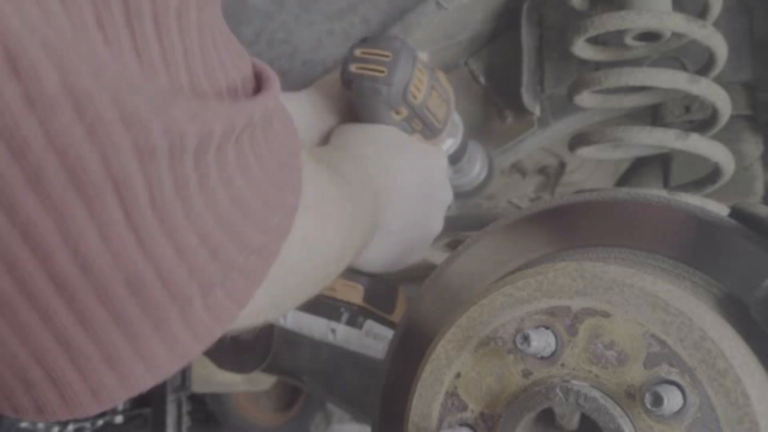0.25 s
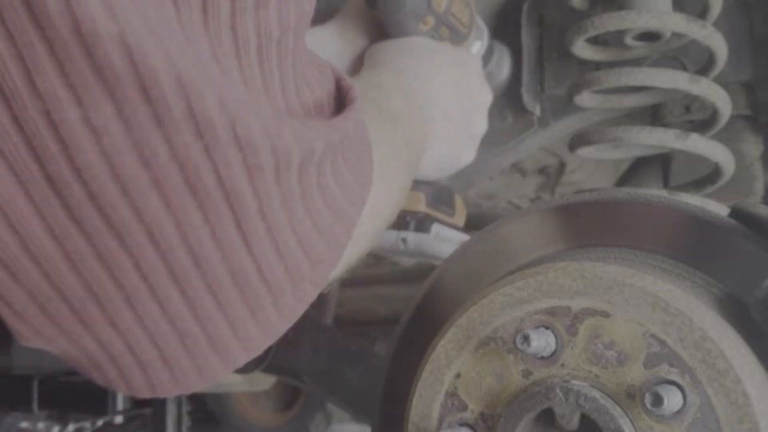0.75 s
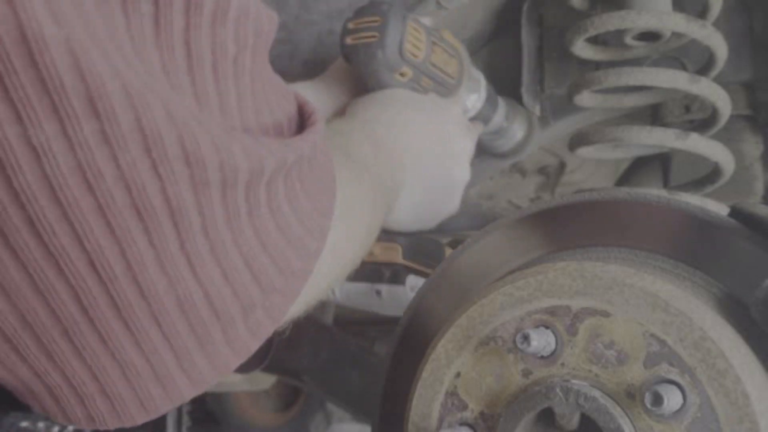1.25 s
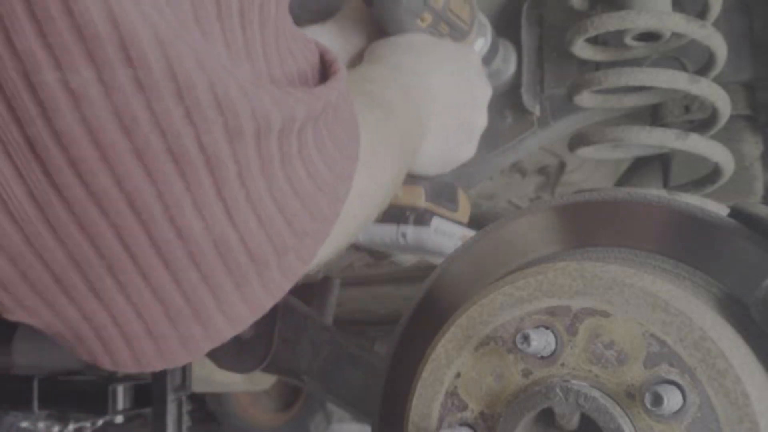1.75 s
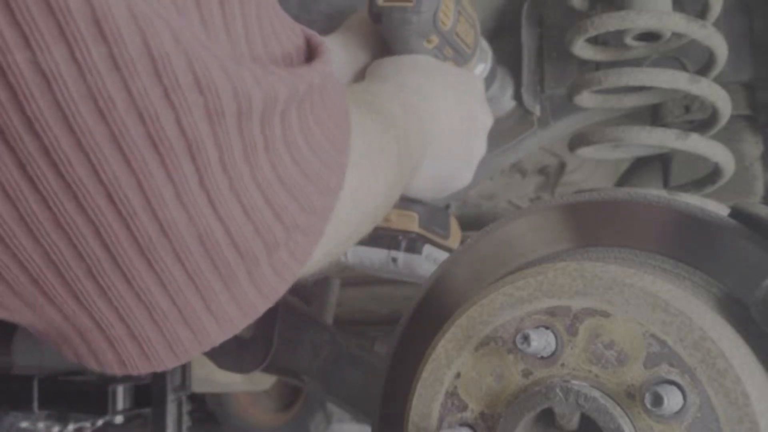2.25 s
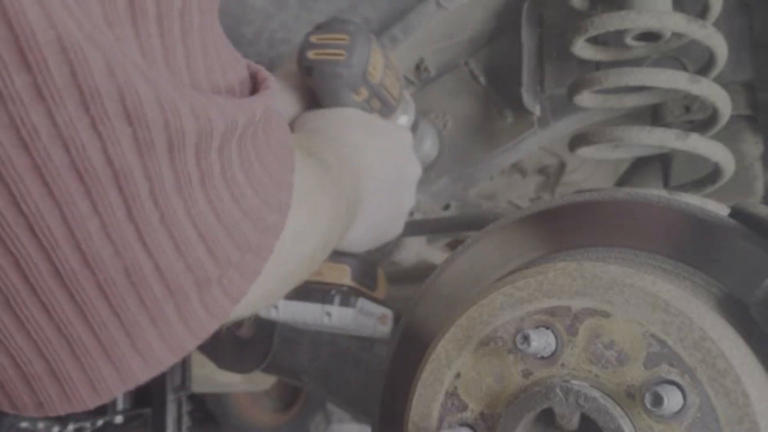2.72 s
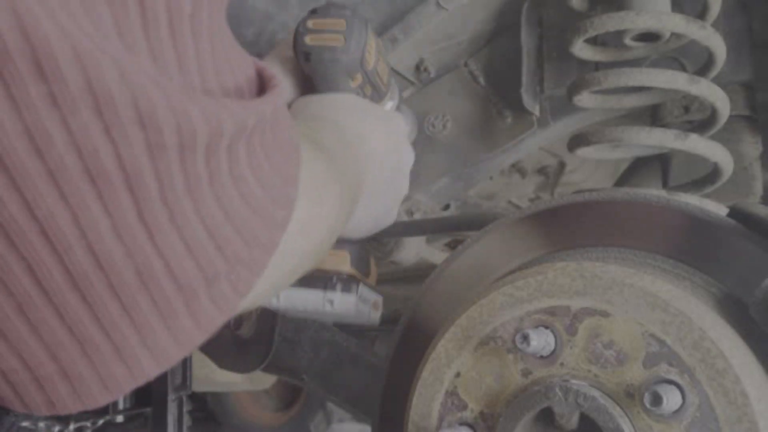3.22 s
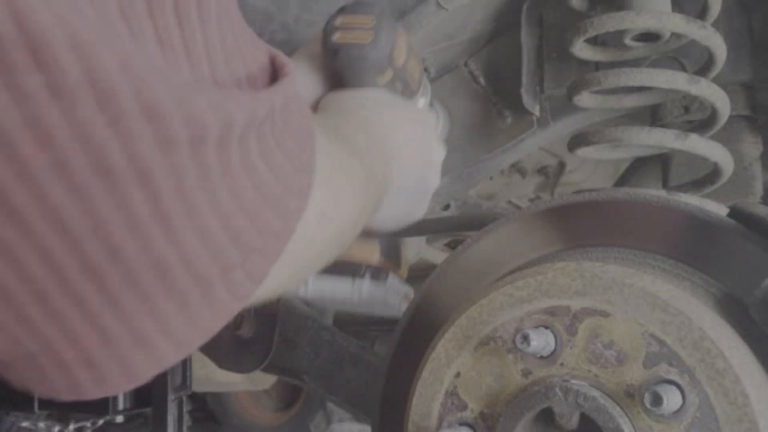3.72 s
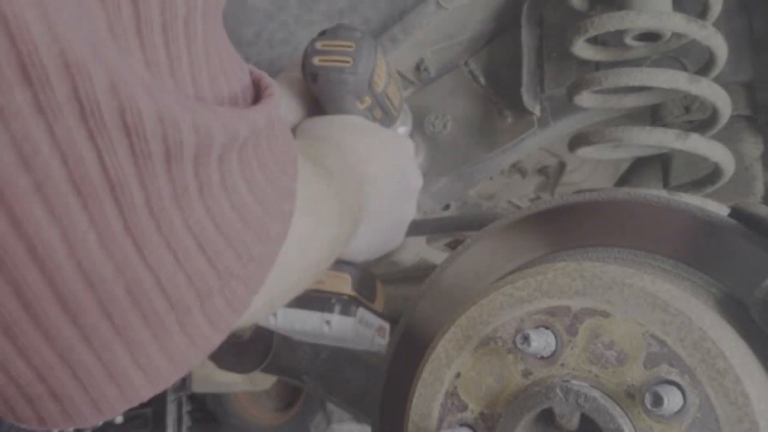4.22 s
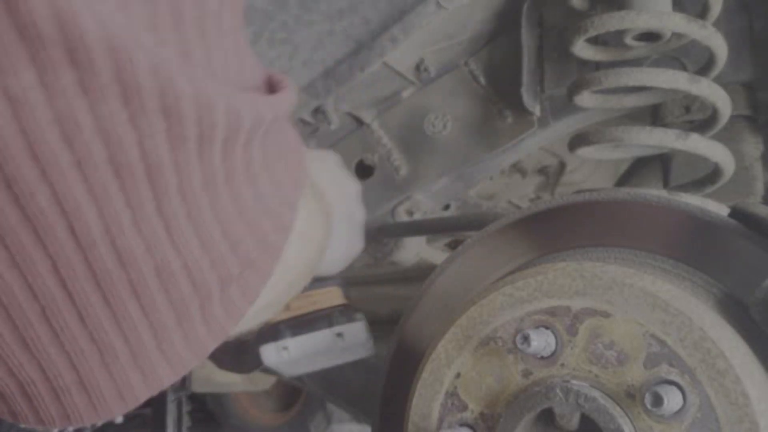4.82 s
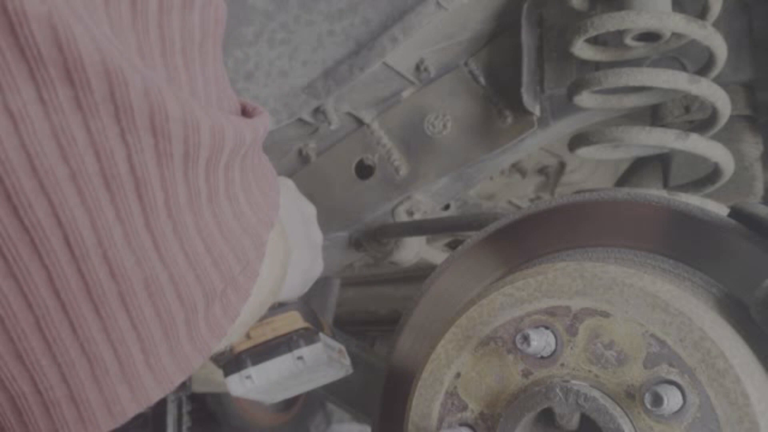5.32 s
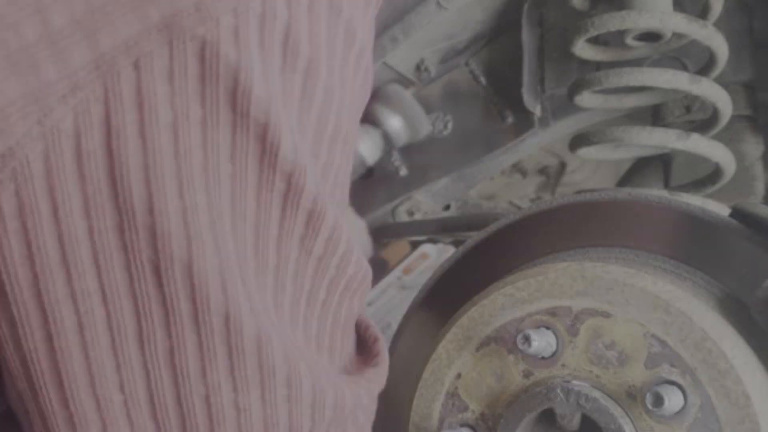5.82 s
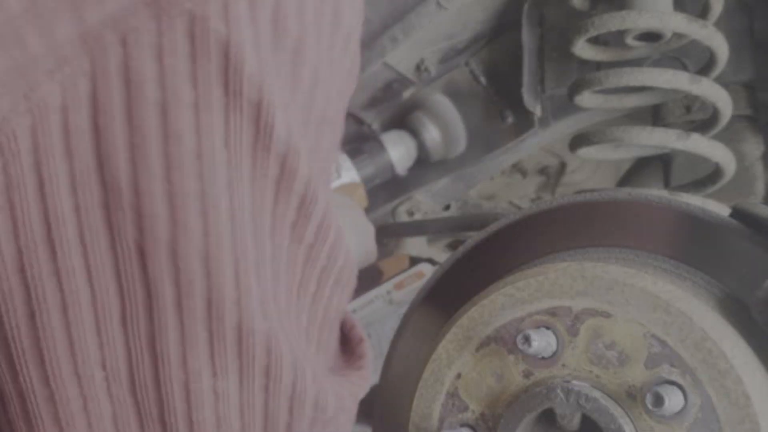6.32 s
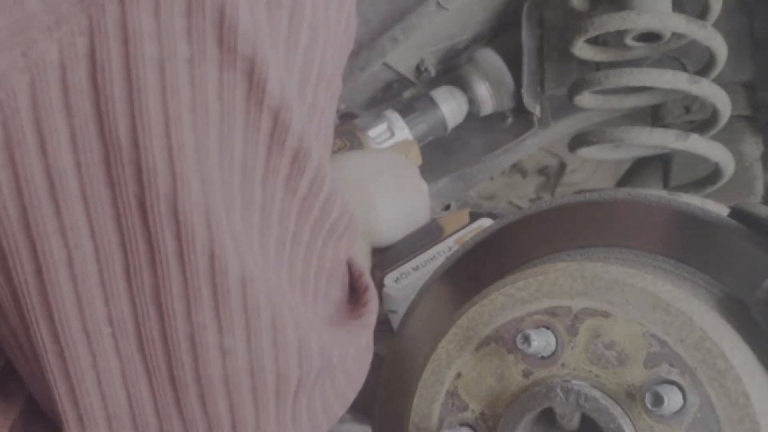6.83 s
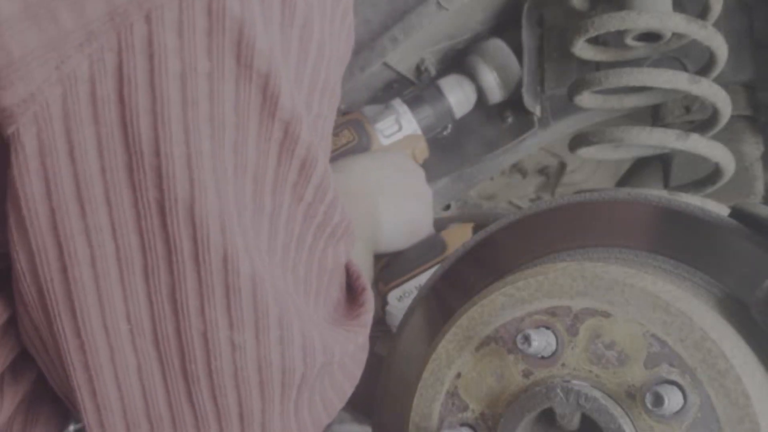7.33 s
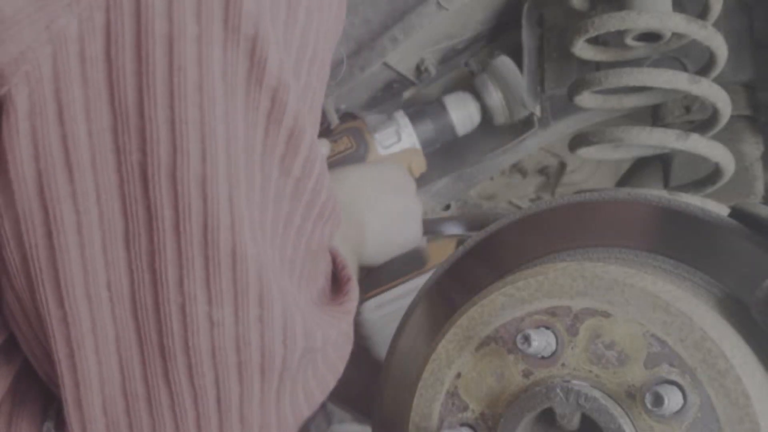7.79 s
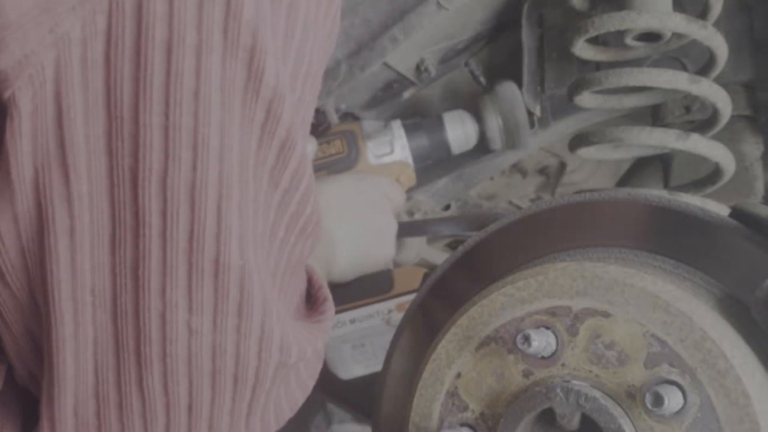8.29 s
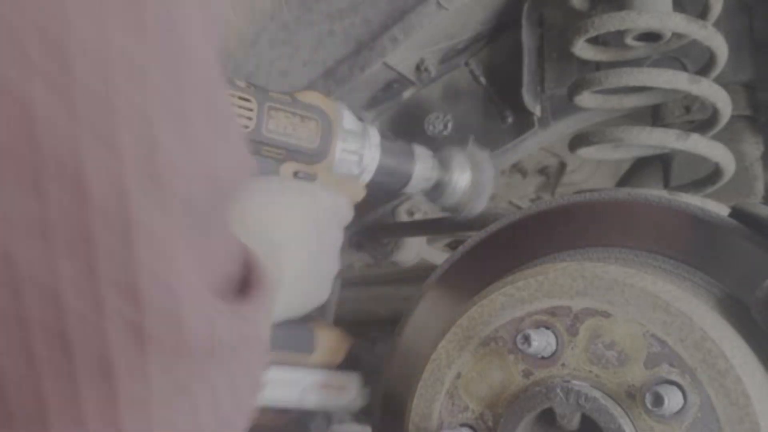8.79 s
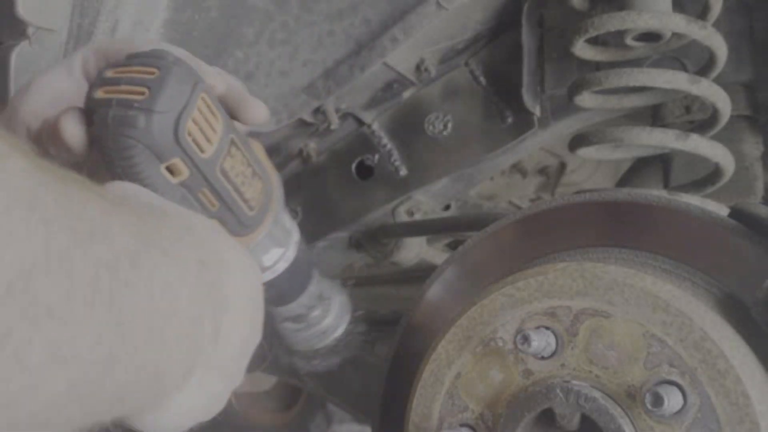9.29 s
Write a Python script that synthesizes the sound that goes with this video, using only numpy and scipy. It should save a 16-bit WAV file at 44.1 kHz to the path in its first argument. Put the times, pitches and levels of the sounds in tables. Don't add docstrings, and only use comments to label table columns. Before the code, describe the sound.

An arm's-length microphone catches continuous wire-brush scouring: a wavering electric whine beneath dense, gritty hiss and sliding metallic rings. Hard hollow knocks break through early, near the middle and later, with a deep hum shaking in at the opening and again around halfway. After fainter hub chatter the wheel stops abruptly with a tiny downward squeal. Quiet garage air is left, with plastic clicks, tiny squeaks and cloth rustle.

```python
import sys
import numpy as np
from scipy import signal
from scipy.io import wavfile
from scipy.ndimage import uniform_filter1d

SR = 44100
rng = np.random.default_rng(int(sys.argv[2]) if len(sys.argv) > 2 else 0)


def linear_from_db(decibels):
    return 10 ** (np.asarray(decibels, float) / 20)


def unload_audio(sound):
    columns = np.transpose(np.atleast_2d(sound))
    steps = np.round(np.clip(columns, -1, 1) * 32767)
    wavfile.write(sys.argv[1], SR, steps.astype(np.int16))


N = 421139
T = np.arange(N) / SR
EARS = np.array([[0.5], [-0.5]])
STOP_S, CUT_S = 8.482, 0.016

# t/s, f/Hz
SPEED = [(0.23, 329.6), (0.5, 347.5), (0.7, 347), (0.82, 326.5), (1.25, 319.8), (1.4, 327), (1.54, 329),
         (1.59, 319), (1.64, 324), (1.7, 318), (1.76, 323), (1.82, 318), (2.0, 319.5), (2.19, 320.5),
         (2.27, 318.5), (2.35, 330), (2.65, 354), (2.87, 344.5), (2.95, 353), (3.05, 342), (3.2, 349),
         (3.55, 349.5), (3.7, 343.5), (3.9, 345), (4.0, 336), (4.12, 328.5), (4.34, 338), (4.45, 346),
         (4.74, 340), (4.83, 343), (4.87, 336), (5.0, 343), (5.1, 345), (5.2, 337.5), (5.3, 341),
         (5.4, 344), (5.53, 341), (5.75, 343), (5.86, 326.6), (6.17, 325), (6.25, 318), (6.31, 327),
         (6.4, 326.7), (6.62, 338), (6.78, 351), (6.92, 338), (7.11, 351.5), (7.4, 343), (7.86, 346),
         (8.03, 338), (8.33, 351), (8.42, 344)]
# t/s, pressure/dB
PRESS = [(0.0, -20), (0.61, -21.5), (0.7, -19), (1.41, -19), (1.51, -22.5), (1.55, -19), (2.24, -19),
         (2.59, -23), (2.85, -21.5), (3.37, -22.5), (4.12, -20), (4.15, -21), (5.18, -24.5), (6.24, -23.5),
         (6.31, -25.5), (7.63, -26), (7.92, -24), (8.46, -27)]


def evened(x):
    return x / np.sqrt(np.mean(x ** 2) + 1e-20)


def read(points, hz):
    f, value = np.transpose(points)
    return np.interp(np.log(hz + 1), np.log(f + 1), value)


def add(mix, s, sound):
    part = mix[..., round(s * SR):][..., :sound.shape[-1]]
    part += sound[..., :part.shape[-1]]


def drift(span):
    return evened(uniform_filter1d(uniform_filter1d(rng.standard_normal(N), span), span))


def power_sum(*levels_db):
    return 10 * np.log10(sum(np.exp(db * np.log(10) / 10) for db in levels_db) + 1e-12)


def swell(at, db, rise, fall):
    u = abs(T - at) / np.where(T < at, rise, fall)
    return db - 20 * u * np.sqrt(u)


def low_cut(x):
    return signal.sosfilt(signal.butter(4, 250, "high", fs=SR, output="sos"), x)


def noise(field_db, patchy_db):
    # f/Hz, likeness/0..1
    likeness = [(60, 1), (250, 1), (700, 0.6), (1400, 0.39), (2800, 0.5), (5600, 0.35), (10000, .02)]
    frames, hz = N // 256 + 5, np.fft.rfftfreq(1024, 1 / SR)
    a, b, c, d, patches, twist = rng.standard_normal((frames, 513, 6)).T
    patches = evened(uniform_filter1d(uniform_filter1d(patches, 2, 0), 22, 1))
    twist = evened(uniform_filter1d(uniform_filter1d(twist, 6, 0), 200, 1))
    twist *= (hz / (hz + 900))[:, None]
    lag = np.exp(1j * (1.66 * twist + 2 * np.pi * hz[:, None] * 2.6 / SR))
    same = np.clip(read(likeness, hz), 0, 1)[:, None]
    left = a + 1j * b
    right = same * left * lag + np.sqrt(1 - same ** 2) * (c + 1j * d)
    z = np.array([left, right])
    z *= linear_from_db(field_db(hz[:, None], np.arange(frames) * 256 / SR) + patchy_db * patches)
    return signal.istft(z, nperseg=1024, noverlap=768)[1][:, :N]


def drill():
    # from t/s, shaft orders 1 to 5 level/dB (five columns), idle mesh level/dB
    facing = np.array([(0.0, -51.5, -39, -39, -48, -50, -40), (0.35, -42, -33.5, -40.5, -51, -48, -48),
                       (0.8, -43.5, -38, -38.5, -42.5, -49, -39),
                       (2.45, -39.5, -39, -43.5, -40, -47, -39.5), (3.3, -39, -40.5, -44, -50, -49, -36),
                       (3.72, -43.5, -41, -42, -35, -46, -38), (4.0, -44, -38, -38, -45, -46, -46),
                       (4.42, -49, -48, -44, -49, -43, -46), (4.74, -52.5, -53, -43.5, -49, -41, -36.5),
                       (5.85, -43.5, -40, -62, -46, -45, -43), (6.45, -44, -39, -55, -48, -41, -50),
                       (6.72, -41, -31, -53, -47, -40, -48), (7.45, -42.5, -31.5, -50, -48, -41, -52)])
    # t/s, length/s, mesh level/dB, mesh octave level/dB
    bites = [(0.71, 0.092, -25, -41), (1.1, 0.44, -32, -30), (1.401, .2, -32, -40.5),
             (1.593, 0.03, -34, -26), (1.64, .1, -30, -40), (1.7, .1, -36, -30), (1.9, 0.08, -46, -26),
             (2.0, .12, -46, -26), (2.11, 0.08, -40, -26), (2.245, 0.045, -34, -25),
             (3.775, 0.34, -30, -43), (3.12, .15, -32, -45), (4.058, 0.18, -26.5, -33),
             (4.13, .07, -40, -30), (4.21, 0.1, -44, -27.5), (4.8, 0.08, -24, -49),
             (4.87, 0.037, -27.5, -27), (5.1, 0.055, -33, -40), (5.22, 0.07, -29, -47),
             (5.314, 0.053, -30, -47), (5.541, .08, -27.5, -46.5), (5.643, 0.082, -30, -46),
             (5.899, 0.098, -37, -49), (6.228, 0.05, -41, -29), (6.417, .06, -48, -34)]
    # peak t/s, level/dB, rise/s, fall/s
    fan_whine = (3.5, -37, 3, 1.5)
    # peak t/s, level/dB, rise/s, fall/s
    heavy_load = [
        (1.05, -37, .3, .3),
        (1.62, -30, .12, .25),
        (1.85, -32, .2, .2),
        (2.17, -29, .2, .15),
    ]
    flutter_depths = [2.6, 2, 3.5, 4, 4, 3, 2.5, 4, 4]
    mesh_order, fan_order = 7.5, 21.3
    free_hz, load_db_per_hz = 348.7, 0.3221
    regrip_s, mesh_octave_db = 0.14, -10.5

    hz = np.interp(T, *np.transpose(SPEED))
    held = facing[np.clip(np.searchsorted(facing[:, 0], T) - 1, 0, None), 1:]
    first, second, third, fourth, fifth, idle = uniform_filter1d(held, round(regrip_s * SR), axis=0).T
    third = third + load_db_per_hz * (free_hz - hz)
    mesh = power_sum(idle, *[swell(at, db, length, length) for at, length, db, _ in bites])
    octave_bites = [swell(at, db, length, length) for at, length, _, db in bites]
    octave = power_sum(idle + mesh_octave_db, *octave_bites)
    eighth = power_sum(*[swell(*row) for row in heavy_load])

    jolts = 1 + 0.003 * drift(1800) + 0.002 * drift(700)
    turns = np.cumsum(hz * jolts) / SR
    orders = [1, 2, 3, 4, 5, mesh_order, 2 * mesh_order, fan_order, 8]
    levels = [first, second, third, fourth, fifth, mesh, octave, swell(*fan_whine), eighth]
    out = np.zeros((2, N))
    for k, db, depth_db in zip(orders, levels, flutter_depths):
        lag = np.array([[-1], [1]]) * 0.036 * k * drift(6000)
        flutter_db = depth_db * (0.8 * drift(900) + 0.6 * drift(300))
        shake = min(0.05 + 0.11 * k, 0.5) * drift(300)
        out += np.sqrt(2) * linear_from_db(db + flutter_db) * np.sin(2 * np.pi * k * turns + shake + lag)
    return out * np.clip((8.44 - T) / 0.028, 0, 1)


def scrape_field(hz, t):
    # f/Hz, level/dB per Hz
    bristles = [(35, -58), (60, -33), (261, -27.5), (337, -9.5), (425, -7), (694, -3.5), (1010, -3),
                (1130, -6.5), (1400, -1), (1890, -2.5), (2560, -2), (6820, -6), (7850, -10.5),
                (11700, -8.5), (15800, -10.5)]
    moves = [.68, 2.55, 4.6, 5.8, 6.27]
    # f/Hz, width/Hz, level/dB
    patches = [
        [(1300, 120, -1.5), (2500, 73, -11.5), (3550, 75, -0.5), (11600, 98, -1)],
        [(1286, 45, 6), (2587, 70, 6.5), (2740, 60, 3), (2980, 30, 0), (3990, 140, -1), (5000, 52, 0.5),
         (5780, 55, 8), (11700, 300, 1.5)],
        [(580, 130, -5.5), (1340, 170, -9.5), (2600, 97, -15.5), (3520, 150, -0.5), (5980, 28, 8),
         (11800, 370, -9)],
        [(1700, 31, 7), (2500, 34, -4.5), (3020, 69, 3), (6100, 90, -8)],
        [(1870, 250, 8.5), (2480, 120, 3), (2920, 100, 0.5), (4000, 130, -1), (11800, 280, -5)],
        [(1500, 100, -4), (1700, 160, 2), (2200, 150, -9), (2950, 56, 1.5), (4050, 120, -1.5),
         (6700, 1000, -2.5), (11700, 280, -4)],
    ]
    # low body level/dB, top fizz level/dB
    colours = [(-6, -7.5), (-6.5, -6.5), (-6, -6), (-5.5, -7.5), (-3, -6), (-2, -5.5)]
    usual_db, low_lag, top_lag = -21, 0.83, 0.63
    stop_low_db, stop_top_db = 9.5, -9.5

    patch = np.searchsorted(moves, t)
    low = 1 / (1 + (hz / 1500) ** 6)
    top = 1 / (1 + (7400 / (hz + 1)) ** 30)
    low_db, top_db = np.transpose(colours)[:, patch]
    ease_db = usual_db - np.interp(t, *np.transpose(PRESS))
    ease_db -= uniform_filter1d(ease_db, 300)
    stopped = np.clip((t - STOP_S) / CUT_S, 0, 1)
    tilt = low * (low_db + 5.0 + low_lag * ease_db + stop_low_db * stopped)
    tilt = tilt + top * (top_db + 6.0 + top_lag * ease_db + stop_top_db * stopped)
    rings = []
    for modes in patches:
        rings.append(sum(linear_from_db(db + 13.0) / (1 + (2 * (hz[:, 0] - f) / (w + 20)) ** 2) for f, w, db in modes))
    fine_db = 1.6 * rng.standard_normal((len(patches), len(hz))) / (1 + hz[:, 0] / 5000)
    ring_db = 10 * np.log10(1 + 0.28 * np.array(rings)) + fine_db
    return read(bristles, hz) + tilt + ring_db[patch].T


def snags():
    # t/s, peak level/dB
    ridges = [(0.1406, -7), (0.2149, -7), (0.7886, -10.5), (0.832, -8), (0.8654, -7), (1.0655, -7),
              (1.1687, -5), (1.4706, -10), (1.6412, -6), (2.1665, -8), (2.2408, -7), (2.3296, -8),
              (2.364, -9), (2.9392, -8), (3.8741, -7), (3.92, -8), (3.9893, -7.5), (4.1749, -9.5),
              (4.6538, -8.5), (4.7082, -10), (4.793, -11), (4.8683, -10), (5.1981, -11.5), (5.5109, -11.5),
              (5.6141, -12), (5.9165, -12), (6.0092, -10.5), (6.0472, -11.5), (6.2003, -9), (6.6179, -13.5),
              (6.6857, -14), (7.5951, -17), (7.7159, -13), (7.873, -15), (7.9823, -9.5), (8.1673, -14),
              (8.3025, -15.5), (8.4407, -14)]
    snag_db, rise_s, fade_s = -18, 0.009, 0.03
    strikes = linear_from_db(3 * np.minimum(rng.exponential(1, N), 2)) * (rng.random(N) < 25 / SR)
    caught, age = np.zeros(N), T[:6000]
    for at, db in ridges:
        peak = linear_from_db(db - np.interp(at, *np.transpose(PRESS)) + snag_db)
        add(caught, at, peak * np.minimum(age / rise_s, 1) * np.exp(-age / fade_s))
    fading = signal.lfilter([1], [1, -np.exp(-1 / (0.03 * SR))], strikes)
    flare = caught + 0.04 * uniform_filter1d(fading, 1000)
    return (1 + flare) / uniform_filter1d(1 + flare, 9000)


def brush():
    # t/s, left-right/dB
    across = [(0, 0), (3.2, .8), (4.2, .3), (5.2, -0.5), (6.2, 0.3), (7, -.1), (8.4, 0.5)]
    cut_db, fade_db_per_s = -9.5, 202
    hiss = noise(scrape_field, patchy_db=2.0)
    band = signal.butter(4, [1500, 7200], "band", fs=SR, output="sos")
    working = signal.sosfilt(band, hiss.mean(0))
    after = np.maximum(T - STOP_S, 0)
    level_db = np.interp(T, *np.transpose(PRESS))
    level_db = level_db + cut_db * np.minimum(after / CUT_S, 1) - fade_db_per_s * after
    hiss *= linear_from_db(level_db) / np.sqrt(uniform_filter1d(working ** 2, 12000))
    turn = 2 * np.pi * np.cumsum(np.interp(T, *np.transpose(SPEED)) / 18) / SR
    wobble = linear_from_db(0.5 * np.sin(turn))
    lean = linear_from_db(EARS * np.interp(T, *np.transpose(across)))
    return low_cut(linear_from_db(-0.5) * lean * hiss * snags() * wobble)


def singing():
    # t/s, length/s, from f/Hz, to f/Hz, level/dB
    slides = [(0.0, 0.32, 2480, 2520, -36), (0, .3, 2460, 2000, -35.5), (1.7, .3, 2670, 2900, -33.5),
              (1.6, .6, 2600, 2610, -33), (3, .35, 2560, 2530, -36), (1.0, .5, 2500, 3030, -35),
              (1.9, 0.45, 3040, 3030, -36), (4, 0.53, 3800, 3800, -36.5), (4.5, .7, 3500, 3800, -35),
              (5.5, .28, 1930, 1850, -32.5), (5.5, .28, 1850, 1740, -32), (7.15, .3, 1120, 1120, -33),
              (8, .2, 1240, 1170, -33.5), (7.5, .5, 1480, 1520, -39), (3.72, 0.28, 1300, 1320, -36),
              (6, .2, 1760, 1600, -36), (5, .22, 2100, 1920, -38), (6.5, 0.255, 1600, 1680, -38),
              (5.5, 0.298, 1530, 1700, -34)]
    width_hz = 24
    r = np.exp(-np.pi * width_hz / SR)
    out = np.zeros((2, N))
    for at, length, from_hz, to_hz, db in slides:
        fuzz, count = rng.standard_normal((32000, 4)).T, round(length * SR)
        slow = signal.lfilter([1], [1, -2 * r, r * r], fuzz[:2] + 1j * fuzz[2:])[:, -count:]
        turn = np.exp(2j * np.pi * np.cumsum(np.linspace(from_hz, to_hz, count)) / SR)
        tone = evened(((slow + 0.73 * slow[::-1]) * turn).real)
        add(out, at, linear_from_db(db) * tone * np.sqrt(np.hanning(count)))
    return out


def knocks():
    # t/s, peak level/dB, tuning factor, ring time factor, brightness/dB per octave
    blows = [(0.741, -9.5, 0.98, 0.45, 4), (0.751, -1.5, 1, 0.3, -3.5), (0.769, -12.5, 1, 0.56, -16),
             (0.779, -16, 0.95, 0.35, -6), (0.807, -15.5, 0.77, 0.35, -3.5), (1.57, -9, 0.97, 0.81, -6),
             (1.61, -12.5, 0.99, 0.8, -9), (4.647, -6, 1.08, 0.5, 0), (4.6531, -2, 1.08, 0.55, 2),
             (4.695, -6, 1.06, 0.36, -1), (6.0096, -2, 1.01, 0.6, 2.5), (6.017, -4, 1, 0.53, 3.5),
             (6.031, -6.5, 1, 0.85, 1.5), (6.246, -19, 0.96, 0.52, -5), (6.585, -22, 1.04, 0.55, -1),
             (6.689, -20.5, 0.96, 0.39, -4), (7.16, -21, 1, 0.5, -10), (7.523, -21.5, 1, 0.48, -3),
             (8.471, -22.5, 0.95, 0.29, -11)]
    # f/Hz, level/dB, t60/s
    rail = [(273, -5, 0.25), (343, 2.5, 0.26), (375.4, 1, 0.21), (459, 10, 0.15), (520, -7, 0.037),
            (650, 6, 0.11), (870, 2, 0.083), (1150, -7, 0.067), (1300, -10, 0.068), (1700, -14, 0.05),
            (2040, -18, 0.045), (3000, -19, 0.04)]
    # t/s, peak level/dB, f/Hz
    chatter = [(7.178, -21, 1130), (7.239, -22, 1170), (7.349, -20, 1142), (7.409, -22.5, 1150),
               (7.71, -24, 1109), (7.8192, -18.5, 1210), (7.917, -21, 1130), (8.0007, -18, 1120),
               (8.1104, -18.5, 1150)]
    # t/s, level/dB, f/Hz, t60/s
    clangs = [(4.653, -18.5, 3350, .06), (4.653, -17, 2340, 0.055), (4.654, -17, 1700, .05),
              (4.66, -20, 1300, .08), (6.008, -16, 1650, .03), (6.009, -19, 3500, 0.027),
              (6.047, -20, 1800, 0.045)]
    out, t = np.zeros(N), T[:9000]
    phases = rng.random((len(blows), len(rail)))
    for (at, db, tune, ring, bright_db), phase in zip(blows, phases):
        crack = signal.lfilter([0.3], [1, -0.8], rng.standard_normal(len(t)))
        body = linear_from_db(2.0 + bright_db - 60 * t / 0.11) * crack
        for (f, mode_db, t60), p in zip(rail, phase):
            level = linear_from_db(mode_db + bright_db * np.log2(f / 450) - 60 * t / (t60 * ring))
            body += level * np.sin(2 * np.pi * (f * tune * t + 0.12 * p))
        body *= 0.6 * np.minimum(t / 0.001, 1) + 0.4 * np.minimum(t / 0.009, 1)
        add(out, at, linear_from_db(db - 2.5) * body / abs(body).max())
    short = t[:3000]
    for at, db, hz in chatter:
        ring = signal.lfilter(*signal.iirpeak(hz, 5.0, SR), rng.standard_normal(3000))
        add(out, at, linear_from_db(db - 4 - 60 * short / 0.29) * evened(ring) * np.minimum(short / 0.012, 1))
    for at, db, hz, t60 in clangs:
        add(out, at, linear_from_db(db - 60 * t / t60) * np.sin(2 * np.pi * hz * t) * np.minimum(t / 0.001, 1))
    return low_cut(out)


def brake():
    # t/s, f/Hz, level/dB
    slowing = [
        (8.41, 930, -48),
        (8.441, 820, -22),
        (8.45, 730, -18),
        (8.464, 610, -25.5),
        (8.48, 520, -33),
        (8.5, 455, -48),
    ]
    s, hz, db = np.transpose(slowing)
    turn = 2 * np.pi * np.cumsum(np.interp(T, s, hz)) / SR
    squeal = np.zeros(N)
    for k, harmonic_db in [(1, 0), (2, -2), (4, -12)]:
        squeal += linear_from_db(harmonic_db + 2 * drift(150)) * np.sin(k * turn + 0.45 * drift(100))
    return linear_from_db(np.interp(T, s, db, left=-99, right=-99)) * squeal


def handling():
    # t/s, peak level/dB, main ring f/Hz, left-right/dB, top of the crack f/Hz
    clicks = [(8.694, -27.5, 610, 1.5, 2750), (8.72, -30, 401, -2, 900), (8.746, -32, 4200, 9, 5000),
              (8.748, -37.5, 1650, 3, 3000), (8.75, -40, 6300, 2, 7200), (8.79, -34, 3200, 4, 4500),
              (8.781, -33, 4230, 4, 4600), (8.875, -37, 2000, 1, 12000), (8.881, -27, 2300, 2.5, 7000),
              (8.883, -30, 6100, -2, 13000), (8.883, -29, 593, -2, 800), (8.899, -26, 1500, -2, 1700),
              (8.922, -28.5, 6600, -7, 7200), (8.923, -30, 600, 0, 5500), (9.082, -34, 2440, 4, 2900),
              (9.094, -27.5, 2320, 5, 4500), (9.096, -32, 1700, 3, 2500), (9.184, -32, 1200, 4, 4200),
              (9.192, -29, 1150, 5.5, 4200), (9.209, -32, 740, 4, 1200), (9.269, -36, 3860, 2, 6000)]
    # t/s, length/s, f/Hz, level/dB
    squeaks = [(8.93, 0.082, 1980, -49), (9.055, 0.03, 3300, -56), (9.27, 0.027, 1960, -53),
               (9.295, 0.062, 2000, -52), (9.0, 0.18, 5100, -56), (9.03, 0.2, 6200, -58),
               (9.16, .025, 3300, -58), (9.3, .05, 600, -57), (9.33, .05, 3260, -64), (9.2, 0.1, 6300, -66),
               (8.68, .025, 2200, -54)]
    # t/s, level/dB
    rustle = [(8.6, -73), (8.86, -61), (8.9, -51.5), (9.1, -53), (9.3, -57.5), (9.4, -63.5), (9.55, -73)]
    # f/Hz, level/dB per Hz
    cloth_spectrum = [(530, -35), (900, -11.5), (1850, -2.5), (4880, -9), (5630, -8), (6510, -2.5),
                      (7700, -22.5), (11600, -16), (15800, -26)]
    t60_at_1khz, damping = 0.1, 0.15
    hold_s = 0.005
    out, t = np.zeros((2, N)), T[:5000]
    for at, db, hz, pan_db, top_hz in clicks:
        t60 = t60_at_1khz * (hz / 1000) ** -damping
        grit = rng.standard_normal((2, len(t))) * (1 + 0.9 * np.exp(-t / 0.0015))
        ring = signal.lfilter(*signal.iirpeak(hz, 15.0, SR), grit[0])
        band = signal.butter(4, [min(1300, 0.36 * top_hz), top_hz], "band", fs=SR, output="sos")
        crack = signal.sosfilt(band, grit)
        rattle = linear_from_db(2.5 * evened(uniform_filter1d(rng.standard_normal(len(t)), 90)))
        decay = linear_from_db(-60 * np.maximum(t - hold_s, 0) / t60) * np.minimum(t / 0.0005, 1)
        click = (1.3 * evened(ring) + evened(crack) * rattle) * decay
        add(out, at, linear_from_db(db - 19.5) * click * linear_from_db(EARS * pan_db))
    for at, length, hz, db in squeaks:
        fuzz = rng.standard_normal(12000)[:round(length * SR)]
        squeak = signal.filtfilt(*signal.iirpeak(hz, min(25, 50000 / hz), SR), fuzz)
        add(out, at, linear_from_db(db) * evened(squeak) * np.sqrt(np.hanning(len(fuzz))) * np.ones((2, 1)))
    s, db = np.transpose(rustle)
    cloth = evened(noise(lambda hz, t: read(cloth_spectrum, hz), patchy_db=1.5))
    return out + cloth * linear_from_db(np.interp(T, s, db, left=-99) + 0.5)


def hum():
    # t/s, f/Hz
    pitch = [(0.0, 71.8), (4.0, 73), (4.44, 62.8), (4.57, 71.34), (4.82, 74.8), (4.92, 64), (5.1, 71.1),
             (5.4, 80.1), (5.83, 83.8)]
    # peak t/s, level/dB, rise/s, fall/s
    swells = [
        (0.0, -15, .05, 0.11),
        (0.24, -34.5, 0.11, .11),
        (0.42, -50, .1, .15),
        (4.58, -14.5, 0.12, 0.12),
        (4.71, -24, .08, .08),
        (4.82, -25.5, 0.15, 0.05),
        (4.96, -20.5, .06, .2),
        (5.2, -12, 0.31, 0.27),
        (5.62, -34.5, .15, 0.38),
    ]
    # t/s, length/s, from f/Hz, to f/Hz, level/dB
    swoop = (4.45, .17, 60, 160, -22)
    open_s, shut_s, opening_s = 4.46, 5.825, 0.071
    octave_under_db, rumble_under_db = -22, -42
    octave_db, rumble_db, faint_db = -32, -33.5, -59
    lurch_s, lurch_db, lurch_wide_s = 4.535, -21, 0.054

    shake = rng.standard_normal((2, N))
    band = signal.butter(2, [50, 190], "band", fs=SR, output="sos")
    rumble = evened(signal.sosfilt(band, shake[0] + 0.87 * shake))
    turn = 2 * np.pi * np.cumsum(np.interp(T, *np.transpose(pitch))) / SR + 0.1 * EARS
    tone = linear_from_db(power_sum(*[swell(*row) for row in swells])) * (T < shut_s)
    opened = np.clip((T - open_s) / opening_s, 0, 1) * (T < shut_s)
    steady_octave = opened * linear_from_db(octave_db) * np.clip((T - 4.75) / 0.18, 0.3, 1)
    octave = np.hypot(tone * linear_from_db(octave_under_db), steady_octave)
    low = np.hypot(tone * linear_from_db(rumble_under_db), opened * linear_from_db(rumble_db) + (T < 0.55) * linear_from_db(faint_db))
    low = np.hypot(low, linear_from_db(swell(lurch_s, lurch_db, lurch_wide_s, lurch_wide_s)))
    octave_tone = octave * linear_from_db(3.5 * drift(600)) * np.sin(2 * turn + 0.77)
    out = np.sqrt(2) * (tone * np.sin(turn) + octave_tone) + linear_from_db(2.0) * low * rumble

    at, length, from_hz, to_hz, db = swoop
    count = round(length * SR)
    rising = np.sin(2 * np.pi * np.cumsum(np.linspace(from_hz, to_hz, count)) / SR)
    add(out, at, linear_from_db(db) * np.sqrt(2) * np.hanning(count) * rising * np.ones((2, 1)))
    return out * linear_from_db(-0.8 * EARS)


def garage(x):
    taps = np.zeros((2, SR // 2))
    at = np.arange(100, SR // 2 - 20, 20) + rng.integers(0, 20, (2, (SR // 2 - 101) // 20))
    np.put_along_axis(taps, at, rng.choice([-1., 1.], at.shape), 1)
    tail = taps * linear_from_db(-60 * T[:SR // 2] / 0.16)
    return signal.fftconvolve(x, tail / np.linalg.norm(tail[0]), axes=1)[:, :N]


def room_air():
    # f/Hz, level/dB per Hz
    air_spectrum = [(15, -46.5), (25, -24.5), (107, -6), (216, -12), (269, -8.5), (291, -13.5),
                    (604, -16.5), (1360, -27), (2200, -33), (15800, -45)]
    return linear_from_db(-55) * evened(noise(lambda hz, t: read(air_spectrum, hz), patchy_db=0))


def scene():
    near = drill() + knocks() + brake() + handling()
    return near + linear_from_db(-11.5) * garage(near) + brush() + singing() + hum() + room_air()


def band_limit(x):
    return signal.sosfilt(signal.butter(12, 15760, fs=SR, output="sos"), x)


def record(dry):
    heard = signal.sosfilt(signal.butter(3, 44, "high", fs=SR, output="sos"), dry)
    heard = heard / (1 + (heard / 0.95) ** 4) ** 0.25
    return band_limit(heard)


dry = scene()
out = record(dry)
unload_audio(out)
```